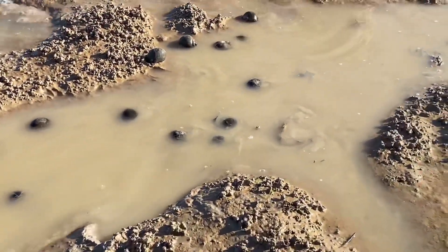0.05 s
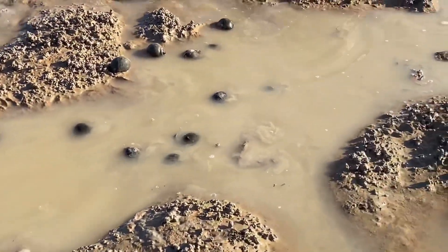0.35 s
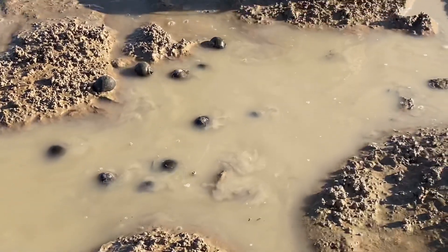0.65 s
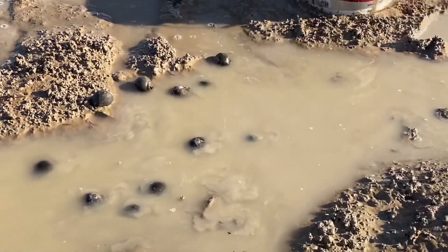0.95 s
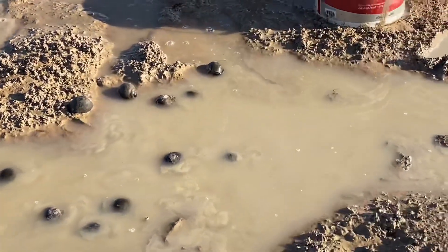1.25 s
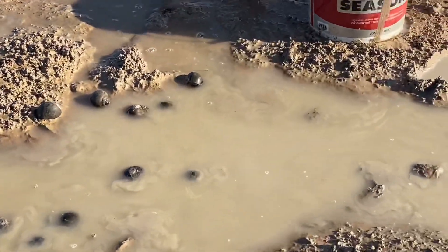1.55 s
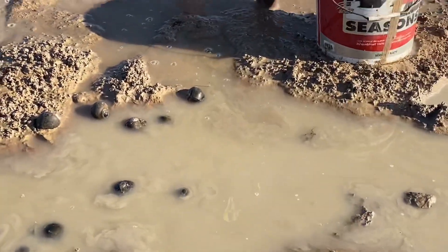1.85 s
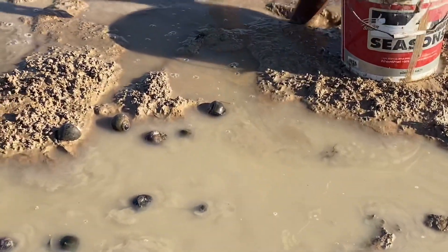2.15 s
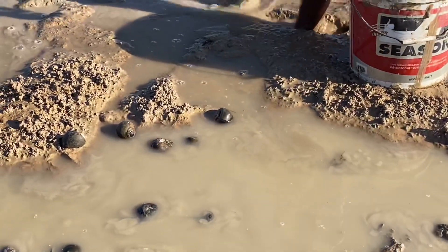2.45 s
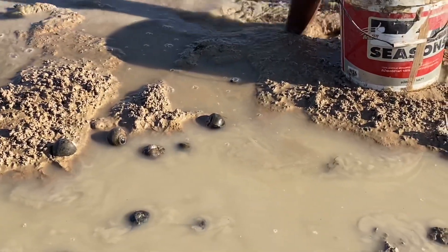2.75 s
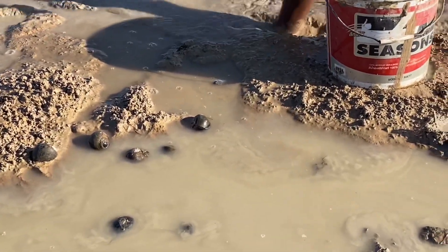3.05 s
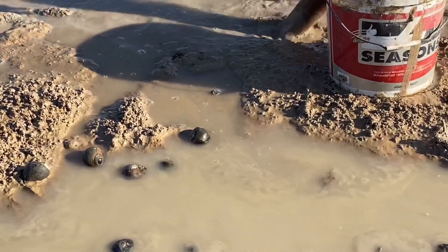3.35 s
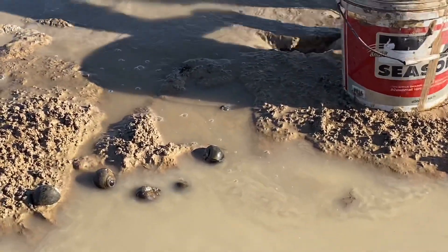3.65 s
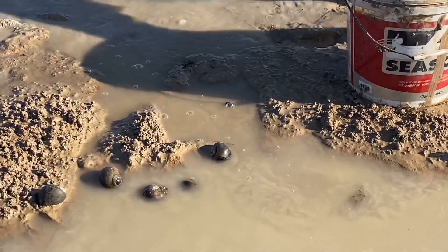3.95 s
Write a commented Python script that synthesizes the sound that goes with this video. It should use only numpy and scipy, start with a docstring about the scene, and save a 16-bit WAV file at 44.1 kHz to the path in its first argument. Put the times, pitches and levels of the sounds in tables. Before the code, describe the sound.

Thick mud glugging as a foot pulls out, after sparse wet pops and clicks.

```python
"""Open field, shallow muddy pool: someone wades, gathering snails. Far rumble and light air throughout.
Wet mud fizzes, and spits as its films tear; a shell knocks the modes of a plastic pail; small bubbles
ring; water and air slosh and whistle through hollows. From about 2.7 s a foot pulls out: the mud heaves,
widening air pockets give low falling glugs, and a narrow gap squirts."""
import sys
import numpy as np
from scipy import signal
from scipy.fft import rfft, irfft, next_fast_len
from scipy.io import wavfile
from scipy.ndimage import map_coordinates

SR = 44100
rng = np.random.default_rng(int(sys.argv[2]) if len(sys.argv) > 2 else 0)


def transcribe(signal):
    """Save signal, clipped to [-1, 1], as a 16-bit WAV file at the path in sys.argv[1]."""
    frames = np.atleast_2d(signal).T
    limited = np.clip(frames, -1, 1)
    pcm = np.round(limited * 32767).astype(np.int16)
    wavfile.write(sys.argv[1], SR, pcm)


N = 176400

# noise spectra: f/Hz, relative level/dB
RUMBLE_SPECTRUM = [(22,-54),(42,-9.5),(62,3),(95,-5),(165,-10.5),(260,-24),(600,-57)]
AIR_SPECTRUM = [(200,0),(700,4),(1900,1),(3000,-17.5),(16000,-92)]
FIZZ_SPECTRUM = [(800,-0.5),(2000,12),(4600,4),(10500,5),(16000,-4)]
CHURN_SPECTRUM = [(30,-12.5),(80,9),(150,1),(260,-19),(450,-28.5),(900,-79)]
SQUIRT_SPECTRUM = [(400,-9),(850,-5.5),(1300,-7.5),(1550,0),(2050,1),(2500,-18),(5500,-32),(9000,-46)]
# stirring of the mud, drives fizz and trickle: t/s, relative level/dB
STIR_ENVELOPE = [(0,-53.5),(.38,-61),(.56,-56),(.92,-65),(1.12,-52.5),(1.62,-61.5),(1.79,-59.5),(1.97,-64.5),(2.28,-56),(2.52,-53.5),(2.95,-58.5),(3.03,-60),(3.28,-64),(3.48,-52),(3.83,-66.5),(3.89,-52.5),(4,-71.5)]
# tearing mud films: t/s, level/dB, centre f/Hz, decay/s
MUD_SPITS = [(0.043,-27.5,1700,0.011),(0.058,-43,2190,0.008),(0.147,-43,6400,0.0059),(0.688,-40.5,8600,0.01),
             (0.969,-34,7670,0.0095),(0.9735,-27.5,2780,0.002),(0.987,-36.5,2960,0.011),(1.102,-38.5,5640,.018),(1.17,-29,3370,0.01),(1.297,-36.5,4030,0.0071),
             (2.008,-29.5,7250,0.0024),(2.206,-35,5300,0.0032),(2.708,-26,6900,0.0031),
             (2.91,-31,3550,0.0024),(2.926,-35,3050,0.013),(3.057,-35.5,2540,0.0019),(3.138,-38,1300,0.012),(3.387,-26.5,9300,0.0019),(3.388,-33,1860,0.0057),(3.402,-21,4170,0.0009),(3.511,-38.5,3640,0.039),(3.801,-36,2500,0.0038)]
# shell on pail: t/s, ring level/dB, click level/dB
PAIL_KNOCKS = [(0.052,-22,-38),(1.179,-13,-7)]
# pail resonances: f/Hz, relative level/dB, t60/s
PAIL_MODES = [(315,-6,0.087),(732,-18.5,0.057),(860,-6,0.035),(1220,-2.5,0.022),(1420,-20,0.03),(2110,-5,0.025),(2540,-22,0.1),(3650,-22.5,0.065)]
# single bubbles, plus two brief rings at 1.173 s from the shell's smack on the pail: t/s, level/dB, start f/Hz,
# t60/s
BUBBLE_POPS = [(.19,-23,2050,0.0073),(.267,-26.5,810,0.015),(0.208,-22.5,1340,0.014),(.283,-25,1050,0.013),(0.295,-23,690,0.019),(0.309,-31.5,1220,0.023),(0.318,-22,587,.036),(.416,-32,640,.06),
               (0.993,-26,1670,0.024),(1.01,-14.5,1840,0.0045),(1.068,-32.5,1090,0.024),(1.1729,-8.5,1260,0.013),(1.173,-11.5,2410,0.016),(1.181,-11,2110,0.018),(1.226,-25.5,1170,0.021),(1.227,-30,664,0.042),(1.298,-34,490,0.06),
               (2.433,-31.5,682,0.046),(2.648,-24.5,2150,0.011),(2.858,-35.5,700,0.053),(2.938,-23,1480,0.01),
               (3.389,-22.5,1140,0.023),(3.404,-28.5,793,0.034)]
# flow through hollows: t/s, level/dB, half length/s, centre f/Hz
WATER_SLOSHES = [(0.3,-45.5,0.042,750),(0.42,-51,0.046,636),(0.507,-42.5,0.03,980),(.565,-46,0.03,1820),(1.19,-46,0.08,1100),(2.54,-42.5,0.023,750),(2.7,-46,.05,1000),(2.89,-50,0.051,1220),(3.423,-42,0.034,920)]
SUCKING_WHISTLES = [(.68,-64,.16,4270),(1.39,-55.5,.08,2190)]
# heave round the foot: t/s, level/dB
CHURN_ENVELOPE = [(2.5,-54),(2.73,-28.5),(2.95,-41),(3.12,-22.5),(3.42,-25.5),(3.7,-31),(3.96,-43.5)]
# big air pockets: t/s, level/dB, start f/Hz
BIG_POCKETS = [(2.754,-24,265),(3.061,-19.5,227),(3.096,-21,314),(3.112,-18,273),(3.145,-14.5,152),(3.171,-19,350),(3.181,-20,437),(3.196,-21,348),
               (3.223,-20,334),(3.234,-19,333),(3.304,-15.5,313),(3.315,-17.5,205),(3.346,-23.5,377),(3.41,-17.5,302),(3.435,-13.5,286),(3.448,-23,487),
               (3.477,-16.5,391),(3.489,-20.5,463),(3.5,-20,434),(3.533,-18.5,525),(3.561,-16.5,517),(3.598,-23.5,524),(3.632,-25,507),
               (3.658,-22.5,595),(3.686,-23,650),(3.712,-21.5,720),(3.749,-26,760),(3.843,-27,500),(3.867,-28.5,487),(3.894,-30,498)]
# microphone ports: f/Hz, left lead/rad
PORT_LEAD = [(7000,0),(8600,-3.14),(10000,-6.3),(14300,-12.6),(15800,-15.7)]


def amp(db):
    """dB to gain."""
    return 10 ** (np.asarray(db) / 20)


def unit(x):
    """Scale to rms 1."""
    return x / np.sqrt(np.mean(x ** 2) + 1e-20)


def along(points, hz):
    """Interpolate (f/Hz, value) rows on a log axis."""
    freqs, values = np.transpose(points)
    return np.interp(np.log(hz + 1), np.log(freqs + 1), values)


def clock(count=N):
    """Sample times in s."""
    return np.arange(count) / SR


def envelope(rows):
    """Gain per sample from (t/s, level/dB) rows."""
    return amp(np.interp(clock(), *np.transpose(rows)))


def wobble(knots_per_s, count=N):
    """Smooth random curve."""
    return map_coordinates(rng.standard_normal(count // 8), [clock(count) * knots_per_s], mode="mirror")


def filtered(x, response):
    """FFT filter by response(hz)."""
    size = x.shape[-1]
    padded = next_fast_len(size + 4096)
    return irfft(rfft(x, padded) * response(np.fft.rfftfreq(padded, 1 / SR)), padded)[..., :size]


def noise(spectrum):
    """Coloured noise, rms 1."""
    return unit(filtered(rng.standard_normal(N), lambda hz: amp(along(spectrum, hz))))


def stereo_noise(spectrum, side_db):
    """Mid/side coloured noise, rms 1."""
    return unit(noise(spectrum) + np.array([[1], [-1]]) * amp(side_db) * noise(spectrum))


def lead_left(pair, lead_rad):
    """Left leads right by lead_rad(hz)."""
    return filtered(pair, lambda hz: np.exp(.5j * np.array([[1], [-1]]) * lead_rad(hz)))


def add(track, start_s, sound):
    """Mix in place."""
    part = track[max(round(start_s * SR), 0):][:len(sound)]
    part += sound[:len(part)]


def background(rumble_db=-36, air_re_rumble_db=-16):
    """Steady far rumble, light air."""
    rumble = stereo_noise(RUMBLE_SPECTRUM, side_db=-15)
    air = stereo_noise(AIR_SPECTRUM, side_db=-1.5)
    return amp(rumble_db) * (rumble + amp(air_re_rumble_db) * air)


def fizz(re_stir_db=3, clump_db=2.5, grain=.53):
    """Wet mud crackles faintly in uneven clumps."""
    grains = rng.standard_normal(N) * np.exp(grain * wobble(1100))
    clumps = amp(clump_db * (wobble(60) + wobble(20) / 2))
    crackle = unit(filtered(grains * clumps, lambda hz: amp(along(FIZZ_SPECTRUM, hz))))
    return amp(re_stir_db) * envelope(STIR_ENVELOPE) * crackle


def cavity_ring(hz, t60_cycles):
    """A tiny burst cavity rings: damped sine, one-cycle attack."""
    t = clock(1000)
    return np.sin(2 * np.pi * hz * t) * amp(-60 * t * hz / t60_cycles) * (1 - np.exp(-t * hz))


def trickle(per_s=86, centre_hz=3600, re_stir_db=8.5):
    """Tiny bubbles burst at random, louder while the mud is stirred."""
    out, stir = np.zeros(N), envelope(STIR_ENVELOPE)
    for when, pitch, size in rng.random((int(per_s * N / SR), 3)):
        hz = centre_hz * np.exp(.8 * (2 * pitch - 1))
        gain = stir[int(when * N)] * amp(re_stir_db - 4.5 * np.log(size + .068))  # few loud, many faint
        add(out, when * N / SR, gain * cavity_ring(hz, t60_cycles=18))
    return out


def spits(width_oct=.66, skirt_db=-3.5, grain=.59, attack_s=.0006):
    """Mud films tear: a short rasp plus sticky snaps round one pitch."""
    out, t = np.zeros(N), clock(8000)
    for start_s, db, centre_hz, decay_s in MUD_SPITS:
        def band(hz):
            peak = np.exp(-.5 * (np.log2((hz + 1) / centre_hz) / width_oct) ** 2)
            skirt = amp(skirt_db) / (1 + (hz / 11000) ** 2)
            return (peak + skirt) * hz ** 2 / (hz ** 2 + 700 ** 2)

        shape = (1 - np.exp(-t / attack_s)) * np.exp(-t / decay_s)
        grains = rng.standard_normal(len(t)) * np.exp(grain * np.tanh(wobble(935, len(t))))
        rasp = unit(filtered(grains * shape, band))
        spit = unit(rasp + snaps(centre_hz, decay_s, width_oct))
        add(out, start_s, amp(db) * spit * np.sqrt(np.mean(shape ** 2)))
    return out


def snaps(centre_hz, decay_s, width_oct, max_hz=15400):
    """Cavities burst in turn inside a spit, each at its own pitch."""
    out = np.zeros(8000)
    for when, pitch in rng.random((int(2 + 700 * decay_s), 2)):
        hz = min(centre_hz * 2 ** (width_oct * (2 * pitch - 1)), max_hz)
        add(out, 2 * when * decay_s, np.exp(-2 * when) * cavity_ring(hz, t60_cycles=14))
    return unit(out)


def pail(attack_s=.001, shell_hz=2330, shell_rise_s=.0011):
    """A shell clicks on the pail; the plastic rings briefly."""
    out, t = np.zeros(N), clock(6000)
    rise = t / shell_rise_s
    click = (rise * np.exp(1 - rise)) ** 3 * np.sin(2 * np.pi * shell_hz * t)
    for start_s, ring_db, click_db in PAIL_KNOCKS:
        ring = sum(amp(db + rng.normal(0, 1) - 60 * t / t60_s) * np.sin(2 * np.pi * hz * t)
                   for hz, db, t60_s in PAIL_MODES)
        add(out, start_s, amp(ring_db) * ring * (1 - np.exp(-t / attack_s)) + amp(click_db) * click)
    return out


def bubbles(pitch_rise=.076, attack_s=.0012, jitter_rad=.84):
    """Bubbles ring briefly and unevenly in thick water, rising a little."""
    out, t = np.zeros(N), clock(4800)
    for start_s, db, start_hz, t60_s in BUBBLE_POPS:
        hz = start_hz * (1 + pitch_rise * np.minimum(t / t60_s, 1))
        phase = 2 * np.pi * np.cumsum(hz) / SR + jitter_rad * wobble(513, len(t))
        shape = (1 - np.exp(-t / attack_s)) * amp(-60 * t / t60_s)
        add(out, start_s, amp(db) * shape * np.sin(phase))
    return out


def hollow_flow(rows, width_oct, lump_db=4):
    """Water or air pushed through mud hollows: wide ones slosh, narrow ones whistle."""
    out = np.zeros(N)
    for peak_s, db, half_s, centre_hz in rows:
        lumps = rng.standard_normal(N) * amp(lump_db * wobble(130))
        flow = filtered(lumps, lambda hz: (1 + (np.log2((hz + 1) / centre_hz) / width_oct) ** 2) ** -1.15)
        out += amp(db) * np.exp(-((clock() - peak_s) / half_s) ** 2) * unit(flow)
    return out


def churn(lump_db=2):
    """Thick mud heaves as the foot works loose."""
    return envelope(CHURN_ENVELOPE) * unit(noise(CHURN_SPECTRUM) * amp(lump_db * wobble(50)))


def glug(db, start_hz, end_ratio=.23, rise_cycles=1.47, decay_s=.0071, jitter_rad=.63):
    """Air sucked into a widening pocket: pitch drops unevenly, at a random speed."""
    t = clock(4000)
    cycles = t * start_hz
    fall_cycles = 2.98 * np.exp(.55 * rng.uniform(-1.01, 1))
    hz = start_hz * (end_ratio + (1 - end_ratio) * np.exp(-cycles / fall_cycles))
    shape = (1 - np.exp(-(cycles / rise_cycles) ** 2)) * np.exp(-t / decay_s)
    phase = 2 * np.pi * np.cumsum(hz) / SR + jitter_rad * wobble(start_hz / 2, len(t))
    return amp(db) * shape / shape.max() * np.sin(phase)


def glugs(small_per_s=70, spread_db=10):
    """Big pockets, with a random gurgle of smaller, lower ones as the mud heaves."""
    out = np.zeros(N)
    for start_s, db, hz in BIG_POCKETS:
        add(out, start_s, glug(db, hz))
    big_s, _, big_hz = np.transpose(BIG_POCKETS)
    span_s = big_s[-1] - big_s[0]
    for when, softness, pitch in rng.random((int(small_per_s * span_s), 3)):
        start_s = big_s[0] + when * span_s
        db = np.interp(start_s, *np.transpose(CHURN_ENVELOPE)) - spread_db * softness
        hz = np.interp(start_s, big_s, big_hz) * (1 + pitch) / 2
        add(out, start_s, glug(db, hz))
    return out


def squirt(start_s=3.512, attack_s=.012, hold_s=.02, release_s=.042, db=-30.5, flutter_db=4.5):
    """Water and air splutter through a narrow gap beside the foot."""
    corners_s = start_s + np.cumsum([0, attack_s, hold_s, release_s])
    shape = np.interp(clock(), corners_s, [0, 1, 1, 0]) ** 2
    return amp(db) * shape * unit(amp(flutter_db * wobble(350)) * noise(SQUIRT_SPECTRUM))


def field(x, side_db=-17, tail_db=-32):
    """Ground and banks scatter: quick sideways reflection, faint tail. Mono to stereo."""
    t = clock(16000)

    def scatter(t60_s):
        impulse = unit(rng.standard_normal(len(t)) * amp(-60 * t / t60_s)) / np.sqrt(len(t))
        return signal.fftconvolve(x, impulse)[:N]

    side = amp(side_db) * scatter(t60_s=.029)
    return np.array([x + sign * side + amp(tail_db) * scatter(t60_s=.42) for sign in (1, -1)])


def scene(foot_lead_rad=-.55):
    """Wet sounds in the open field; the foot's low sounds off to one side."""
    foot = lead_left(field(glugs() + churn()), lambda hz: foot_lead_rad)
    flow = hollow_flow(WATER_SLOSHES, width_oct=.86) + hollow_flow(SUCKING_WHISTLES, width_oct=.09)
    return background() + foot + field(bubbles() + spits() + pail() + squirt() + flow + fizz() + trickle())


def record(dry):
    """Two microphone ports, out of phase in the treble; band limit."""
    top_hz = 15400
    ports = lead_left(dry, lambda hz: along(PORT_LEAD, hz))
    return filtered(ports, lambda hz: hz < top_hz)


dry = scene()
out = record(dry)
transcribe(out)
```